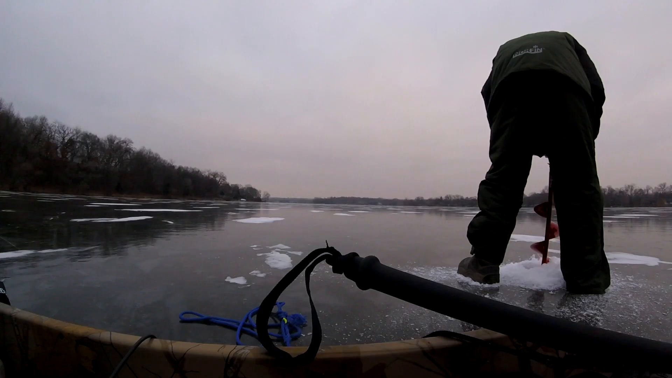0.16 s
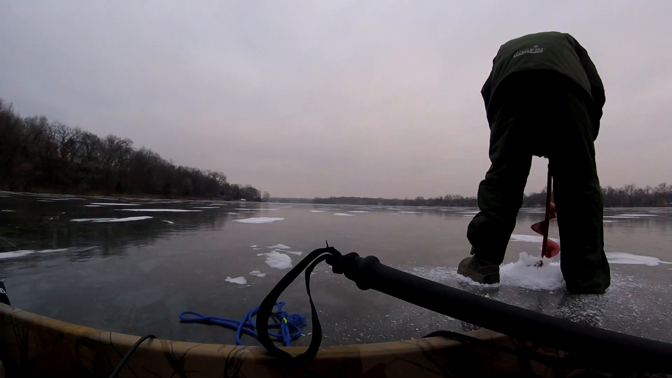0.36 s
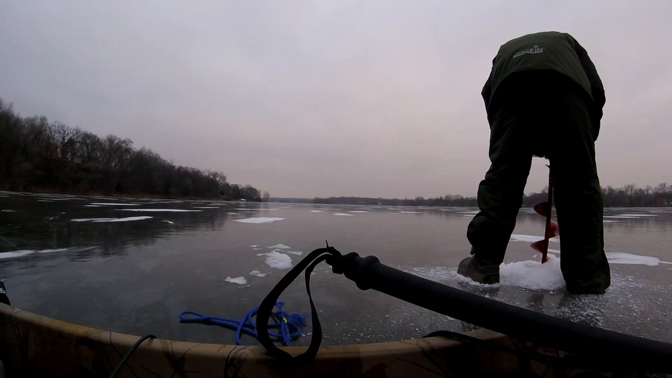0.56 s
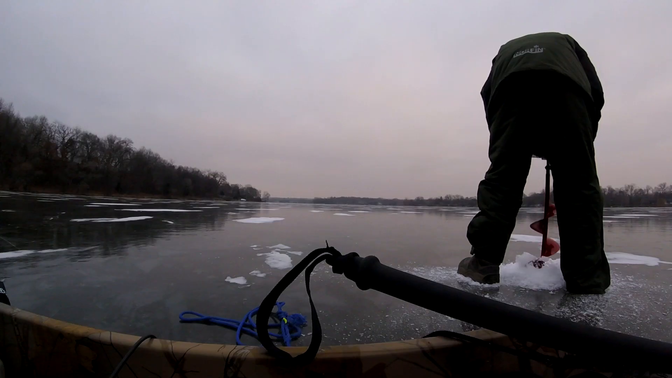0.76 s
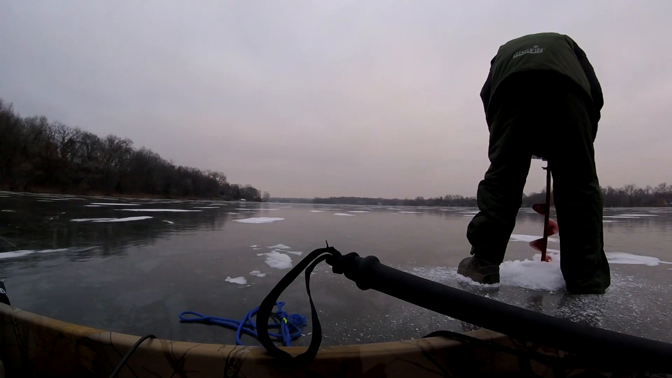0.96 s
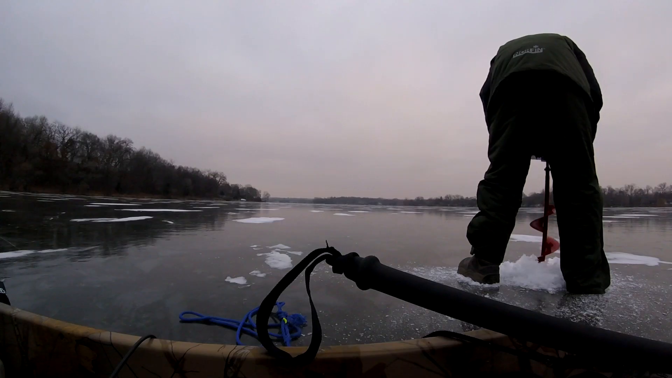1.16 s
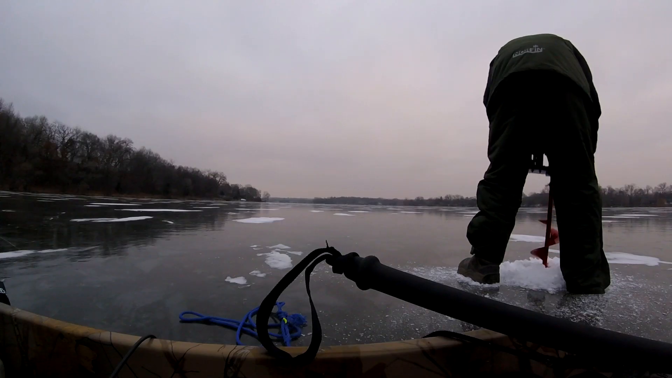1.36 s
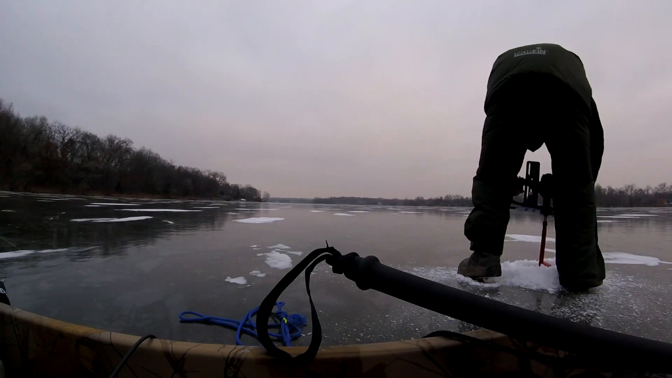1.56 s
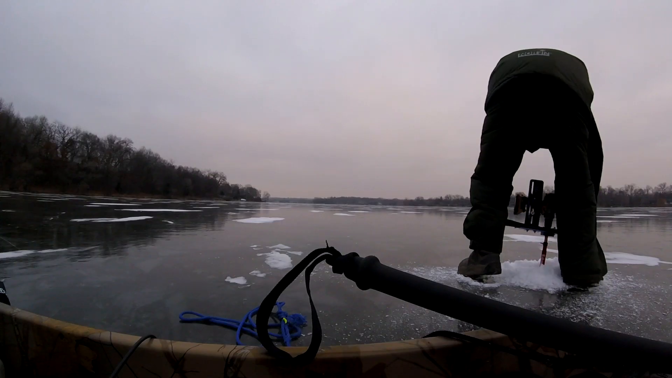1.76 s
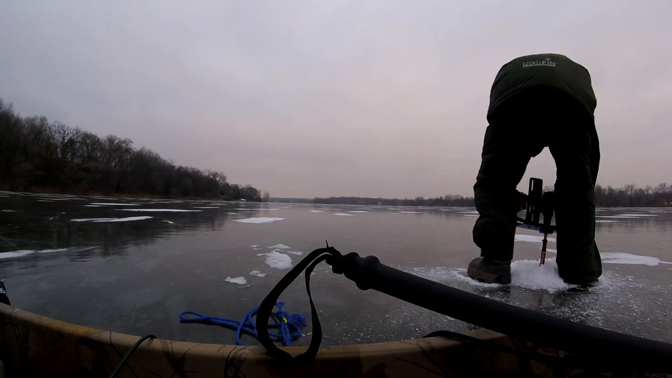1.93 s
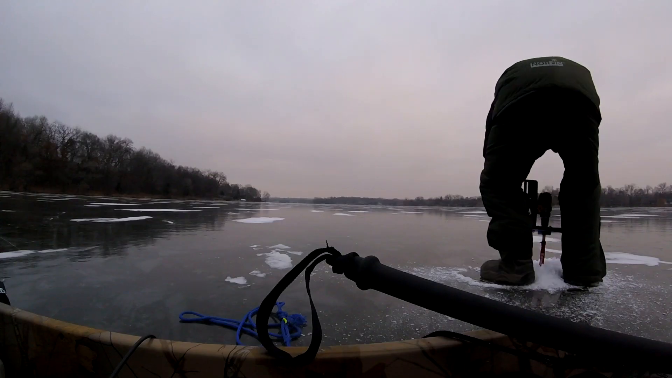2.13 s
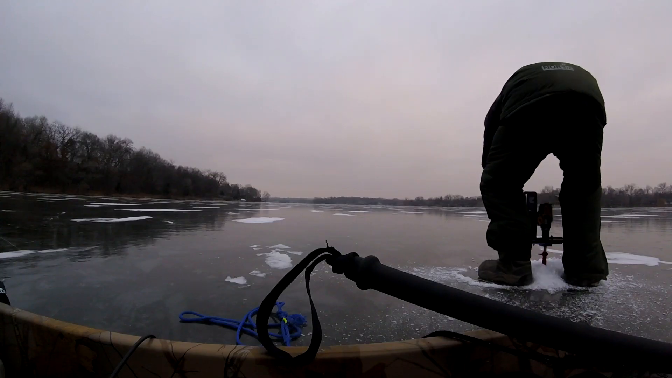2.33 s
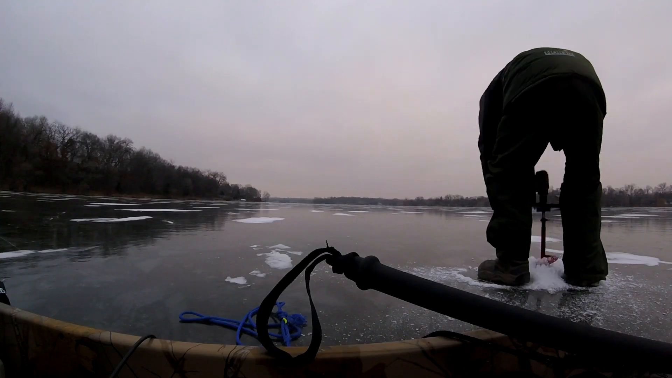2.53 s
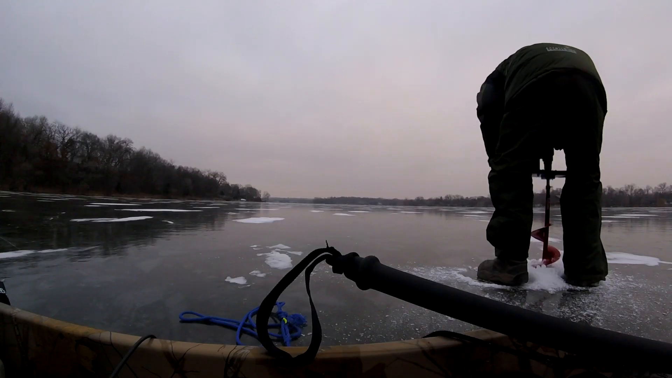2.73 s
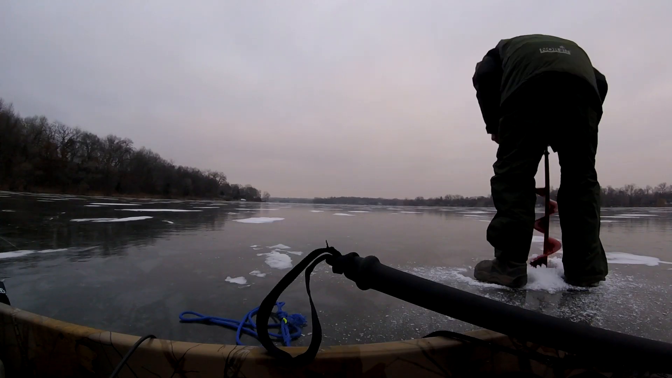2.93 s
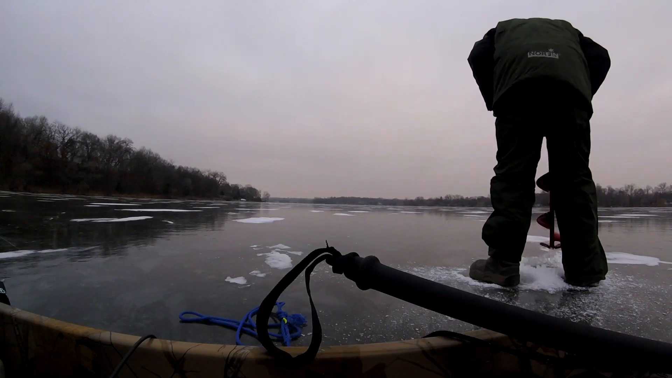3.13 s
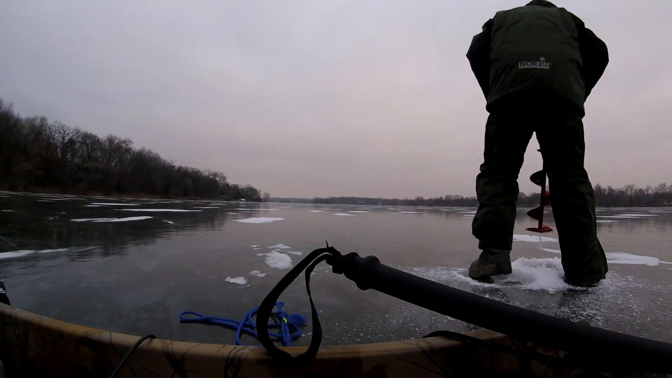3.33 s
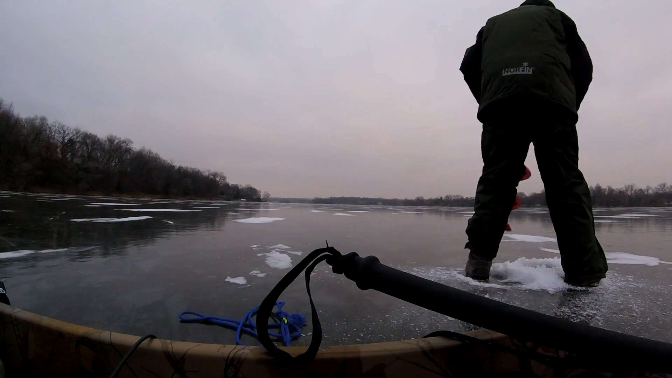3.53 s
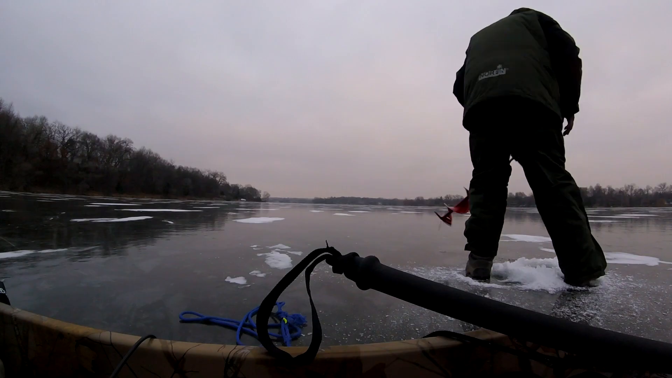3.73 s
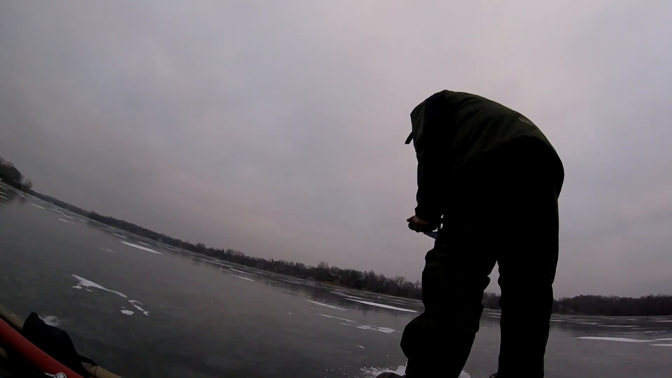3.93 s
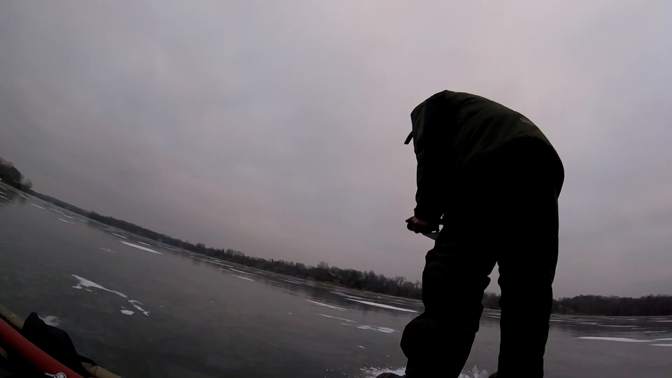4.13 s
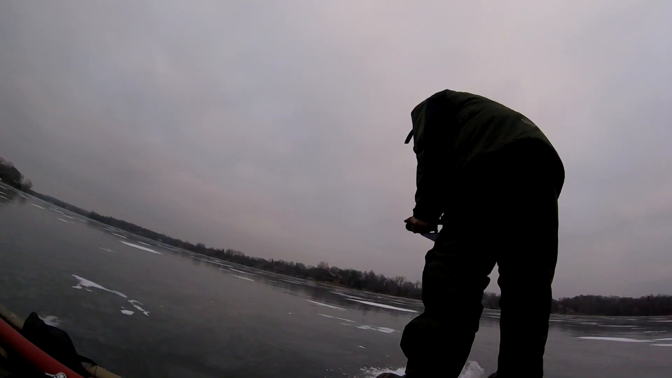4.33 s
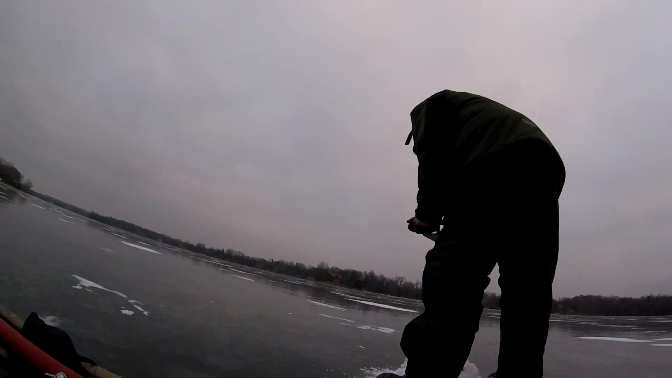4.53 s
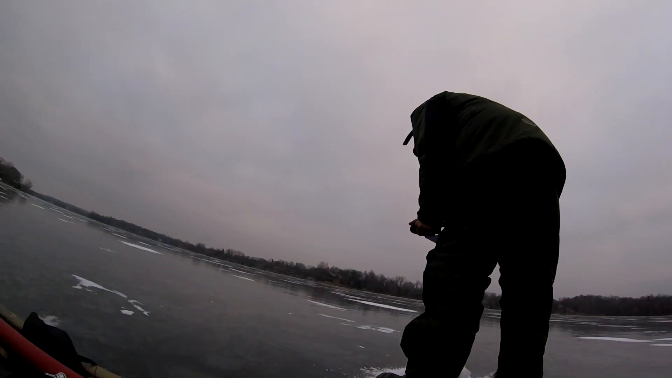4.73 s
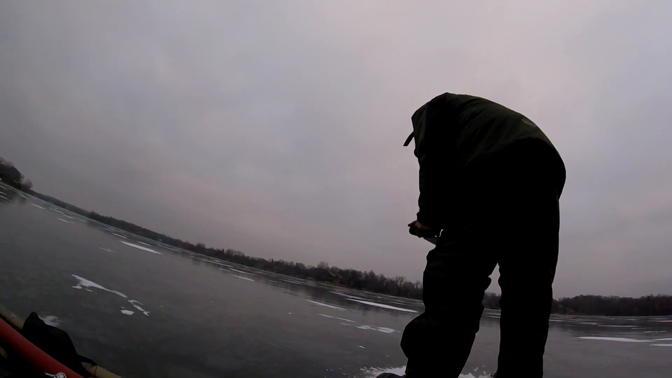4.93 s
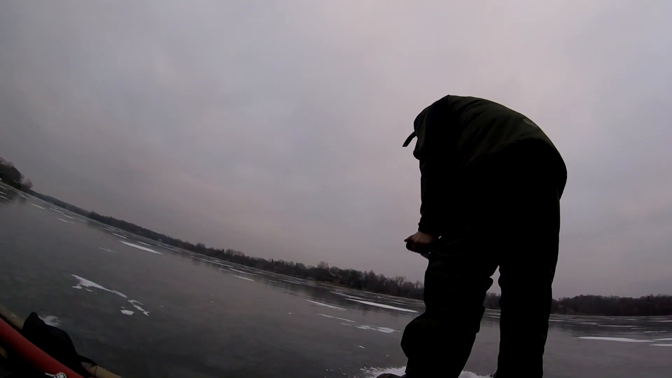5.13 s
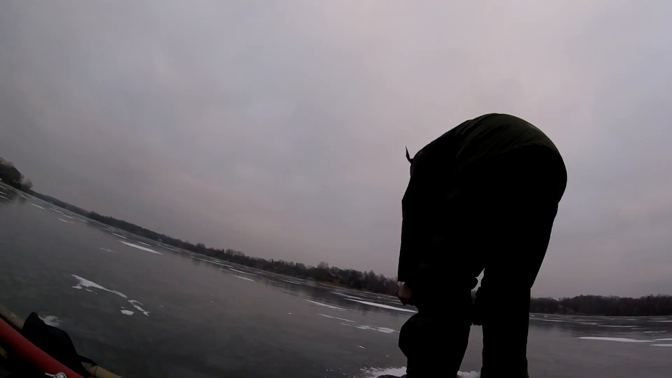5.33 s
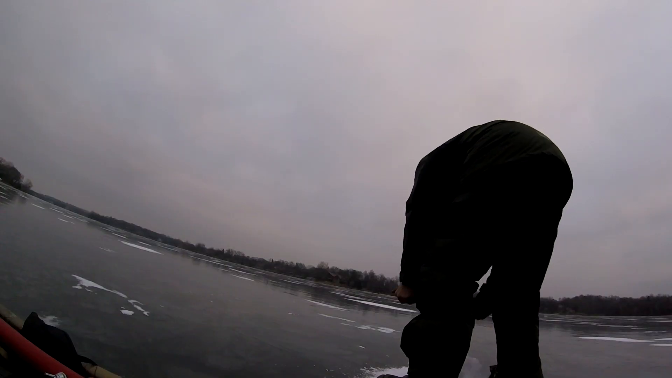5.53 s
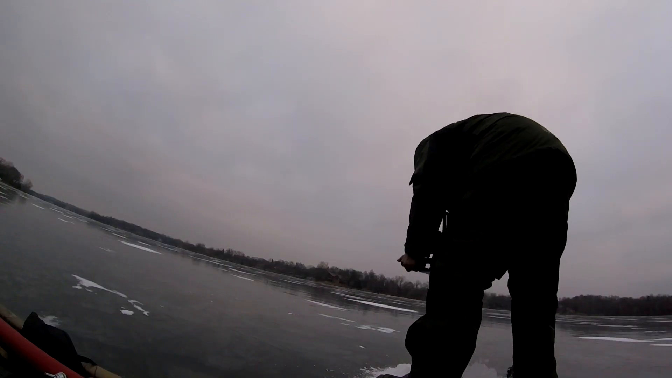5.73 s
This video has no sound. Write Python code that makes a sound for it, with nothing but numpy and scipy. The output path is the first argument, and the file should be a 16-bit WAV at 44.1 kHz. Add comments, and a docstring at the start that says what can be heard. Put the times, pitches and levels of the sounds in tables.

```python
"""A hand auger shaves into lake ice with a rising rasp at each push; the last thin ice drums and gives way.
The spiral is pulled through gulping slush as clothing swishes; chips crack and ring on steel, crumbs trickle.
A second, more ragged cut follows and ends in more gulps, slush strokes and the drag of sleeves.
Cuts are clumped noise breaks through steel and ice filters, gulps are clouds of decaying sines, and cloth
is wavering tones. Filtered noise makes the dull ice sheet, the gusts and the open air underneath."""
import sys
import numpy as np
from scipy import signal
from scipy.fft import rfft, irfft
from scipy.io import wavfile
from scipy.ndimage import uniform_filter1d

SR = 44100
rng = np.random.default_rng(int(sys.argv[2]) if len(sys.argv) > 2 else 0)


def generate_wav(signal):
    """Clip the signal to [-1, 1] and save it as 16-bit WAV at the path in sys.argv[1]."""
    frames = np.transpose(np.atleast_2d(signal))
    scaled = np.clip(frames, -1, 1) * 32767
    pcm = np.round(scaled).astype(np.int16)
    wavfile.write(sys.argv[1], SR, pcm)


N = 259515
TIME = np.arange(N) / SR

# bouts of steady cutting, hiss and crunch before each cut's trim:
# [start t/s, end t/s, release t/s, blade hiss level/dB, ice crunch level/dB, ice sheet shudder level/dB]
BOUT_TABLE = [(0.018, 1.363, 0.025, -39, -42.5, -63.5), (3.854, 5.09, 0.054, -39, -47, -60)]
# water and slush heaved in the hole: [start t/s, length t/s, level/dB, middle bubble pitch f/Hz]
GULP_TABLE = [(1.45, 0.027, -46.5, 174), (1.639, 0.037, -49, 470), (1.923, 0.018, -51.5, 188),
              (2.292, 0.04, -53.5, 337), (2.477, 0.075, -43, 304), (2.511, 0.047, -48.5, 840),
              (2.56, 0.07, -49.5, 230), (2.85, 0.049, -49.5, 444), (2.915, 0.064, -55, 830),
              (5.074, 0.068, -44.5, 810), (5.169, 0.025, -42.5, 470), (5.293, 0.018, -47.5, 850),
              (5.391, 0.055, -41, 620), (5.469, 0.05, -39, 600), (5.58, 0.042, -35, 454),
              (5.744, 0.055, -39, 550)]
# spectrum of ice cracking on steel: [f/Hz, relative level/dB]
CRACK_SPECTRUM = [(150, -31), (600, -8.5), (1200, -11.5), (2700, -6), (4500, -11.5), (8000, -6.5),
                  (9300, -15), (10000, -28.5), (11300, -28.5), (13000, -36.5)]


def amp(db):
    """Turns decibels into a linear gain."""
    return 10 ** (np.asarray(db) / 20)


def unit(x):
    """Scales a signal to an rms of 1."""
    return x / np.sqrt(np.mean(x ** 2) + 1e-20)


def add(mix, s, sound):
    """Mixes a sound in at time s."""
    part = mix[max(round(s * SR), 0):][:len(sound)]
    part += sound[:len(part)]


def drift(per_s):
    """Smooth random curve of rms 1: noise whose changes faster than about per_s a second are damped."""
    hz = np.fft.rfftfreq(N, 1 / SR)
    spectrum = rfft(rng.standard_normal(N))
    return unit(irfft(spectrum / (1 + (hz / per_s) ** 4), N))


def response(points, size=2048):
    """Causal (minimum phase) impulse response of energy 1 with the given spectrum."""
    hz, db = np.transpose(points)
    bin_hz = abs(np.fft.fftfreq(size, 1 / SR)) + 1
    log_gain = np.log(amp(np.interp(np.log(bin_hz), np.log(hz), db)))
    h = np.fft.ifft(np.exp(np.conj(signal.hilbert(log_gain)))).real[:size // 2]
    return h / np.linalg.norm(h)


def through(x, h):
    """Passes a signal through an impulse response, cut to the scene's length."""
    return signal.oaconvolve(x, h)[:N]


def noise(points):
    """Noise of rms 1 coloured by a spectrum."""
    return unit(through(rng.standard_normal(N), response(points)))


def resonate(x, hz, width):
    """A resonance of gain 1 that can follow a moving pitch: shift it to zero, smooth, shift back."""
    turn = np.exp(2j * np.pi * np.cumsum(hz * np.ones(len(x))) / SR)
    r = np.exp(-np.pi * width / SR)
    return 2 * (turn * signal.lfilter([1 - r], [1, -r], x / turn)).real


def gate(start, end, fade_s):
    """Opens at start and has closed by end, with straight fades."""
    return np.clip(np.minimum(TIME - start, end - TIME) / fade_s, 0, 1)


def bump(s, length):
    """A smooth swell of height 1 around time s."""
    return np.exp(-2 * ((TIME - s) / length) ** 2)


def contour(points, fade_s=0.0033):
    """Gain along a curve whose last column is dB, silent outside it."""
    s, *_, db = np.transpose(points)
    return amp(np.interp(TIME, s, db)) * gate(s[0], s[-1], fade_s)


def held(start, end, release_s, hiss_db, crunch_db, attack_s=0.001):
    """Gains of hiss and crunch for steady work: a quick attack, a hold and a release."""
    attack = np.clip((TIME - start) / attack_s, 0, 1)
    release = np.exp(-np.maximum(TIME - end, 0) / release_s)
    return np.outer(amp([hiss_db, crunch_db]), attack * release)


def swelling(rows, ends_db, attack_s, release_s):
    """Gains of hiss and crunch for movements that grow to a crest, ebb and die away."""
    gains = np.zeros((2, N))
    for start, crest, end, hiss_db, crunch_db in rows:
        swell = amp(np.interp(TIME, [start, crest, end], [ends_db, 0, ends_db]))
        attack = np.clip((TIME - start) / attack_s, 0, 1)
        release = np.exp(-np.maximum(TIME - end, 0) / release_s)
        gains += np.outer(amp([hiss_db, crunch_db]), swell * attack * release)
    return gains


def fractures(per_s, spread_db, dust_db):
    """Tiny breaks at random moments, their sizes scattered by spread_db, over a bed of fine powder."""
    sizes = amp(spread_db * np.minimum(rng.exponential(1, N), 4)) * rng.choice([-1, 1], N)
    breaks = unit(sizes * (rng.random(N) < per_s / SR))
    return unit(breaks + amp(dust_db) * rng.standard_normal(N))


def auger():
    """Even shaving in the first bout, a more ragged cut in the second; soft slush and sparse crumbs between."""
    # strokes of the spiral through loose slush, before trim:
    # [start t/s, crest t/s, end t/s, hiss level/dB, crunch level/dB]
    stroke_rows = [(1.385, 1.458, 1.497, -46.5, -50), (1.48, 1.62, 1.772, -44, -49.5),
                   (5.13, 5.17, 5.18, -41.5, -45), (5.2, 5.49, 5.555, -43.5, -49),
                   (5.565, 5.6, 5.735, -47.5, -54.5), (5.74, 5.76, 5.88, -49, -56)]
    # showers of crumbs from the lifted spiral, before trim:
    # [start t/s, crest t/s, end t/s, hiss level/dB, crunch level/dB]
    crumb_rows = [(1.87, 1.9, 2.06, -67.5, -71.5), (2.235, 2.33, 2.375, -65, -68.5),
                  (2.41, 2.6, 2.81, -47, -54.5), (2.84, 2.88, 2.93, -48.5, -55.5),
                  (2.95, 2.98, 3.093, -60.5, -68.5), (3.145, 3.24, 3.3, -68, -64),
                  (3.67, 3.76, 3.81, -72, -76)]
    # crumbs trickling all through the pause, before trim:
    # [start t/s, end t/s, release t/s, hiss level/dB, crunch level/dB]
    trickle_rows = [(1.79, 3.855, 0.02, -72.5, -78)]
    # crunch of the first cut: [f/Hz, relative level/dB]
    first_ice = [(150, -12), (450, -14), (650, 1.5), (880, 2), (1100, 5), (1350, -4.5), (2000, 2),
                 (2400, 1.5), (3200, 4), (3700, -1), (4400, -4), (6000, -7), (10000, -39)]
    # crunch of the second, wetter cut: [f/Hz, relative level/dB]
    wet_ice = [(150, -14), (450, -7.5), (680, 1.5), (1000, 0), (1350, -3), (2000, -4), (2650, -0.5),
               (3200, -4), (4100, -6.5), (6000, -31), (10000, -47)]
    # loose slush and crumbs: [f/Hz, relative level/dB]
    slush_spectrum = [(200, -23), (700, 8.5), (1300, 2), (2200, 2.5), (3200, 2), (4200, -5), (8000, -20),
                      (10000, -27.5), (13000, -22)]

    sliding = swelling(stroke_rows, ends_db=-8, attack_s=0.013, release_s=0.011)
    falling = swelling(crumb_rows, ends_db=-5, attack_s=0.0065, release_s=0.013) + held(*trickle_rows[0])
    first = scrape(cutting(BOUT_TABLE[0]), first_ice, fractures(per_s=2400, spread_db=2.0, dust_db=2.5),
                   clump_db=0.2, clumps_per_s=126, hiss_db=0.5, crunch_db=-1, ring_db=-4.5)
    second = scrape(cutting(BOUT_TABLE[1]), wet_ice, fractures(per_s=1700, spread_db=0.1, dust_db=-1.5),
                    clump_db=0.54, clumps_per_s=95, hiss_db=0.15, crunch_db=0.76, ring_db=-2.5)
    slush = scrape(sliding, slush_spectrum, fractures(per_s=1800, spread_db=-2, dust_db=0),
                   clump_db=1.8, clumps_per_s=35, hiss_db=-0.5, crunch_db=0, ring_db=-7.0)
    crumbs = scrape(falling, slush_spectrum, fractures(per_s=300, spread_db=7.5, dust_db=3.5),
                    clump_db=1.5, clumps_per_s=98, hiss_db=-1.0, crunch_db=2.0, ring_db=-3)
    return first + second + slush + crumbs


def cutting(bout):
    """Gains of hiss and crunch in a bout; the hiss jumps or dips where the blades bite or skid."""
    # blades biting deeper or skidding: [middle t/s, length t/s, change of hiss level/dB]
    bite_rows = [(0.09, 0.046, 2.5), (0.45, 0.1, 2), (0.825, 0.05, 1), (1.0, 0.03, 2.5), (3.96, 0.041, 2.5),
                 (4.173, 0.15, 1.5), (4.44, 0.024, 3), (4.545, 0.04, -2.5), (4.607, 0.026, 2),
                 (4.652, 0.025, -4.5), (4.748, 0.018, 2.5), (5.025, 0.084, 0.5)]
    hiss, crunch = held(*bout[:-1])
    return hiss * amp(sum(db * bump(s, length) for s, length, db in bite_rows)), crunch


def scrape(gains, ice, breaks, clump_db, clumps_per_s, hiss_db, crunch_db, ring_db, wander_db=0.5):
    """Breaks come in clumps as the steel catches and slips; each sounds in the spiral and in the ice."""
    drive = unit(breaks * amp(clump_db * drift(clumps_per_s)))
    in_spiral = turning(through(drive, steel(ring_db)), delay_ms=0.889, swing_ms=0.096, echo=0.51)
    hiss = unit(in_spiral * amp(wander_db * drift(54)))
    # random signs keep the crunch from cancelling the hiss where their spectra overlap
    signs = rng.choice([-1, 1], N)
    crunch = flakes(turning(through(drive * signs, response(ice))))
    return amp(hiss_db) * gains[0] * hiss + amp(crunch_db) * gains[1] * crunch


def steel(ring_db):
    """One chip striking the spiral: a bright tick and the short ring of the steel."""
    # bright tick of the blades: [f/Hz, relative level/dB]
    hiss_spectrum = [(3000, -22), (4000, -16.5), (4500, -6), (4900, 0.5), (5900, -4), (6600, 3),
                     (7600, -4.5), (8900, -7.5), (9600, -18), (10200, -49), (11200, -27.5), (12500, -46),
                     (14000, -71)]
    # resonances of the steel spiral: [f/Hz, width f/Hz, relative level/dB]
    steel_modes = [(5190, 190, -13), (5358, 240, -1), (6425, 85, 0.5), (6820, 230, -10)]
    tick = response(hiss_spectrum)
    t = np.arange(len(tick)) / SR
    modes = sum(amp(db) * width * np.exp(-np.pi * width * t) * np.cos(2 * np.pi * hz * t)
                for hz, width, db in steel_modes)
    ring = np.convolve(modes, tick)[:len(t)]
    h = tick + amp(ring_db) * ring / np.linalg.norm(ring)
    return h / np.linalg.norm(h)


def turning(x, turns_per_s=1.3, delay_ms=1.415, swing_ms=0.54, echo=0.1):
    """The turning spiral reflects the sound over a path that swings unevenly with each turn."""
    swing = np.sin(2 * np.pi * turns_per_s * TIME) + .5 * drift(5.8)
    lag = (delay_ms + swing_ms * swing) * SR / 1000  # in samples
    return unit(x + echo * np.interp(np.arange(N) - lag, np.arange(N), x))


def flakes(x, patchy_db=2.5):
    """Each flake has its own size, so the colour of the crunch shifts from moment to moment."""
    z = signal.stft(x, nperseg=512)[2]
    across_pitch = uniform_filter1d(rng.standard_normal(z.shape), size=4, axis=0)
    patches = unit(uniform_filter1d(across_pitch, size=7, axis=1))
    return unit(signal.istft(z * amp(patchy_db * patches))[1][:N])


def rasp(width_hz=420, gain_db=-1):
    """The blades chatter in a broad resonance that climbs from a low pitch and levels off in each push."""
    # pushes of the crank, before gain_db: [start t/s, length t/s, level/dB]
    push_rows = [(-0.16, 0.34, -49.5), (0.245, 0.32, -47.5), (0.64, 0.3, -47.5), (1.01, 0.32, -48.5)]
    low_hz, top_hz, climb_s, fade_s = 1780, 2810, 0.084, 0.054
    breaks, out = fractures(per_s=1300, spread_db=3, dust_db=1), np.zeros(N)
    for start, length, db in push_rows:
        pitch = top_hz - (top_hz - low_hz) * np.exp(-((TIME - start) / climb_s) ** 2)
        chatter = unit(resonate(resonate(breaks, pitch, width_hz), pitch, width_hz))
        out += amp(db) * gate(start, start + length, fade_s) * chatter
    return amp(gain_db) * out * (TIME > BOUT_TABLE[0][0])


def breakthrough(ring_hz=920, width_hz=620):
    """Coarse breaks ring the thin floor of the hole just before it gives way."""
    # drumming of the last thin layer of ice: [t/s, level/dB]
    thin_ice_curve = [(1.22, -73), (1.30, -45.5), (1.335, -43), (1.375, -37.5), (1.395, -59)]
    breaks = fractures(per_s=780, spread_db=10.5, dust_db=-1.0)
    return contour(thin_ice_curve) * unit(resonate(resonate(breaks, ring_hz, width_hz), ring_hz, width_hz))


def chips(crumble_s=0.0037, crumble=0.44, gain_db=0.5, size=900):
    """Each chip cracks on the steel, snapping and crumbling within a few thousandths of a second."""
    # chips of ice, before gain_db: [t/s, peak level/dB, crack against ring level/dB]
    chip_rows = [(1.3337, -37, 4), (1.3643, -29, 10), (1.4505, -32.5, -5), (1.6538, -43, 9),
                 (1.8828, -45.5, 2), (1.9804, -47.5, 6), (2.2456, -52, 0), (2.363, -43.5, -1),
                 (2.426, -28.5, 6), (2.4561, -21, 3), (2.4929, -24, -2), (2.498, -25, -11),
                 (2.59, -25.5, 4), (2.5978, -30, -2), (2.6618, -27.5, 3), (2.841, -38, 8),
                 (2.9222, -35, -6), (3.1455, -48, -11), (3.196, -51, -4), (3.353, -49.5, 1),
                 (3.6721, -47, 0), (3.9679, -28, -16), (4.178, -23, -10), (5.179, -33, 0),
                 (5.2983, -35.5, 4)]
    out, ring, crack = np.zeros(N), steel(ring_db=-3.0), response(CRACK_SPECTRUM)
    for s, db, crack_db in chip_rows:
        snap = crumble * rng.standard_normal(size) * np.exp(-np.arange(size) / SR / crumble_s)
        snap[0] = 1
        sound = signal.fftconvolve(snap, ring + amp(crack_db) * crack)
        add(out, s, amp(db + gain_db) * sound / abs(sound).max())
    return out


def spills(crack_db=0):
    """A heap of wet crumbs slides off the spiral and lands as a short patter."""
    # small heaps of slush: [start t/s, length t/s, level/dB]
    spill_rows = [(1.876, 0.036, -61.5), (1.921, 0.03, -56.5), (2.227, 0.083, -66), (2.418, 0.027, -55),
                  (2.47, 0.045, -43.5), (3.183, .11, -58.5), (3.712, 0.1, -69)]
    landing = steel(ring_db=11) + amp(crack_db) * response(CRACK_SPECTRUM)
    patter = through(fractures(per_s=600, spread_db=8.5, dust_db=-6), landing)
    out = np.zeros(N)
    for s, length, db in spill_rows:
        part = patter[round(s * SR):round((s + length) * SR)]
        add(out, s, amp(db) * unit(part * signal.windows.tukey(len(part), .5)))
    return out


def nearby(x, delay_s=0.0034, echo=0.14):
    """One early reflection from gear close by."""
    return (x + echo * np.interp(TIME - delay_s, TIME, x, left=0)) / np.hypot(1, echo)


def gulps(spread=0.42, cycles=1.13, rise=0.029, tilt=0.93, fade=0.3, tail_s=0.053, gain_db=0, count=40):
    """A gulp is a cloud of bubbles ringing the hole; large ones sound lower and longer, each rising in pitch."""
    # resonances of the bored hole: [f/Hz, width f/Hz, level/dB]
    hole_modes = [(400, 30, 2.5), (632, 30, -1)]
    out = np.zeros(N)
    for s, length, db, pitch_hz in GULP_TABLE:
        t = np.arange(0, length + 2 * tail_s, 1 / SR)
        place = (np.arange(count)[:, None] + rng.random((count, 1))) / count  # position within the gulp
        radius = np.exp(spread * rng.standard_normal((count, 1)))
        turns = np.maximum(t - place * length, 0) * pitch_hz / radius
        age = turns / cycles
        strength = np.minimum(radius, 1 / radius) ** tilt * rng.choice([-1, 1], (count, 1))
        strength = strength * (1 - fade * place ** 2)  # the surge runs out
        bubbles = strength * age * np.exp(-2 * age) * np.sin(2 * np.pi * turns * (1 + rise * age))
        cloud = bubbles.sum(0)
        cloud = cloud + sum(amp(mode_db) * resonate(cloud, hz, width) for hz, width, mode_db in hole_modes)
        cloud = cloud * np.clip((t[-1] - t) / tail_s, 0, 1)
        add(out, s, amp(db + gain_db) * cloud / np.sqrt(np.sum(cloud ** 2) / (length * SR)))
    return out


def splashes(splash_db=-14, ring_hz=1250, width_hz=900):
    """Each gulp throws up a fine spatter of slush."""
    drops = fractures(per_s=700, spread_db=3.5, dust_db=-6)
    spatter = unit(resonate(resonate(drops, ring_hz, width_hz), ring_hz, width_hz))
    return spatter * sum(amp(db + splash_db) * bump(s + length / 2, length)
                         for s, length, db, _ in GULP_TABLE)


def swishes(blur_hz=13, rough_db=3.5, overtone_db=-15, slowing=0.089, gain_db=-2.5):
    """Ribs of the weave zip over each other: a fuzzy whistle whose pitch follows the speed of the limb."""
    # brief swishes of nylon on nylon, before gain_db: [middle t/s, length t/s, top pitch f/Hz, level/dB]
    swish_rows = [(1.539, 0.073, 1553, -50), (1.6, 0.06, 2130, -53.5), (2.162, 0.07, 1334, -70),
                  (5.36, 0.08, 2500, -55)]
    # long drags of the sleeves as the auger is lifted, pulled clear, pressed and pushed down,
    # before gain_db: [t/s, pitch f/Hz, level/dB]
    lift_curve = [(1.555, 4560, -55), (1.575, 4120, -53), (1.605, 3294, -57), (1.625, 3200, -53),
                  (1.665, 3400, -48), (1.73, 3080, -62)]
    pull_curve = [(2.675, 3420, -53), (2.725, 3400, -52.5), (2.79, 3700, -58), (2.9, 3740, -69.5)]
    press_curve = [(5.22, 1420, -54), (5.26, 1340, -60), (5.305, 1559, -53), (5.345, 1314, -59),
                   (5.375, 1226, -50), (5.4, 1176, -68)]
    push_down_curve = [(5.49, 1310, -53), (5.545, 1600, -66), (5.58, 1020, -55)]
    # folds that sound together in a drag: [pitch ratio, relative level/dB]
    lift_folds = [(0.97, -2.5), (0.505, -2)]
    pull_folds = [(0.98, 0)]
    press_folds = [(1, 2), (0.79, -2), (1.615, -2)]
    drags = [(lift_curve, lift_folds), (pull_curve, pull_folds),
             (press_curve, press_folds), (push_down_curve, press_folds)]

    waver, flutter = blur_hz * drift(247), unit(amp(rough_db * drift(110)))

    def whistle(hz):
        """A wavering tone with a weak overtone."""
        phase = 2 * np.pi * np.cumsum(hz + waver) / SR
        return np.sin(phase) + amp(overtone_db) * np.sin(2 * phase)

    out = np.zeros(N)
    for s, length, top_hz, db in swish_rows:
        arch = np.maximum(1 - (2 * (TIME - s) / length) ** 2, 0)  # the limb speeds up and slows again
        out += amp(db) * arch * whistle(top_hz * (1 - slowing * (1 - arch)))
    for drag, folds in drags:
        s, hz, _ = np.transpose(drag)
        pitch = np.interp(TIME, s, hz)
        out += contour(drag) * sum(amp(db) * whistle(ratio * pitch) for ratio, db in folds)
    return amp(gain_db) * np.sqrt(2) * flutter * out


def shudder(rest_db=-68, slosh_db=-54, settle_s=0.3, follow=0.7):
    """The ice sheet sounds dully at rest, louder under the blades and after each heave of the water."""
    # dull sound of the ice sheet: [f/Hz, relative level/dB]
    sheet_spectrum = [(40, -18), (130, 3), (250, 1.5), (420, -2), (750, -2), (1100, -8.5), (2500, -27),
                      (8000, -59)]
    strongest_db = max(db for _, _, db, _ in GULP_TABLE)
    heaves = [amp(follow * (db - strongest_db)) * (TIME > s) * np.exp(-abs(TIME - s) / settle_s)
              for s, _, db, _ in GULP_TABLE]
    slosh = np.max(heaves, axis=0)
    work = sum(amp(db) * gate(start, end + release_s, release_s)
               for start, end, release_s, _, _, db in BOUT_TABLE)
    return (amp(rest_db) + np.hypot(work, amp(slosh_db) * slosh)) * noise(sheet_spectrum)


def surroundings(breeze_db=-63, gust_db=-2, air_db=-63):
    """A light wind with a few gusts rumbles on the microphone over the faint noise of the open air."""
    # gusts, before gust_db: [middle t/s, length t/s, level/dB]
    gust_rows = [(0.1, 0.063, -53), (1.614, 0.14, -51.5), (3.038, 0.031, -57), (3.955, 0.082, -45),
                 (4.267, 0.083, -47.5), (4.486, 0.19, -53), (4.983, 0.12, -42), (5.195, 0.033, -42),
                 (5.572, 0.32, -54)]
    # wind rumble: [f/Hz, relative level/dB]
    wind_spectrum = [(10, -12), (25, -3.5), (45, 1.5), (90, -3), (150, -15), (400, -57), (1500, -49.5)]
    # open air: [f/Hz, relative level/dB]
    air_spectrum = [(59, -15), (100, -1), (131, -8), (203, -10.5), (346, -33), (380, -11.5), (435, -18),
                    (637, -19.5), (687, -22.5), (1620, -58), (9570, -42), (12400, -84), (21100, -120)]
    gusts = sum(amp(db) * bump(s, length) for s, length, db in gust_rows)
    wind = amp(breeze_db) + amp(gust_db) * gusts
    return wind * noise(wind_spectrum) + amp(air_db) * noise(air_spectrum)


def scene():
    """Open ice gives no reverberation, and both channels hear the same."""
    drilling = nearby(auger() + rasp() + breakthrough() + spills() + chips())
    mono = drilling + gulps() + splashes() + swishes() + shudder() + surroundings()
    return np.array([mono, mono])


def record(dry, edge_hz=12300):
    """A steep low-pass ends the treble at edge_hz."""
    lowpass = signal.firwin(101, edge_hz, window=("kaiser", 8), fs=SR)
    return signal.oaconvolve(dry, lowpass[None], "same")


dry = scene()
out = record(dry)
generate_wav(out)
```